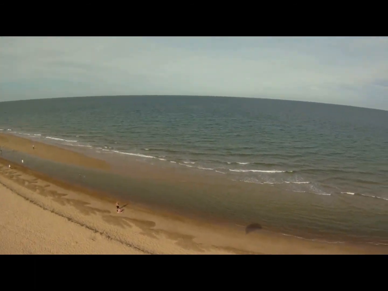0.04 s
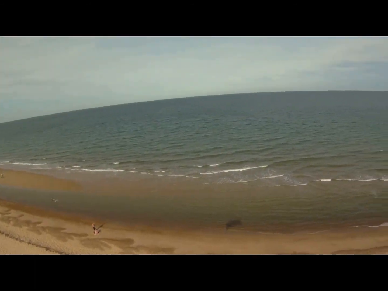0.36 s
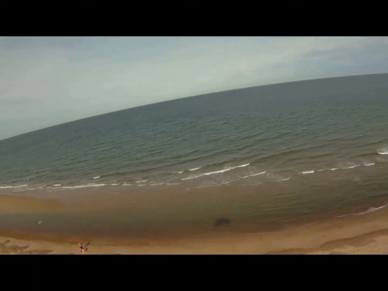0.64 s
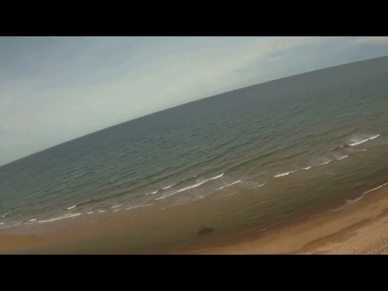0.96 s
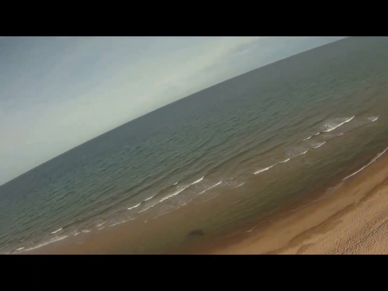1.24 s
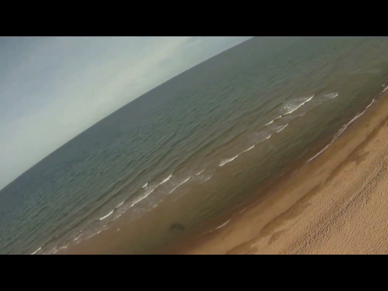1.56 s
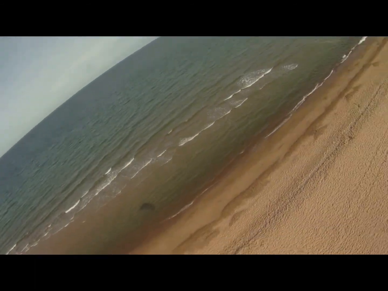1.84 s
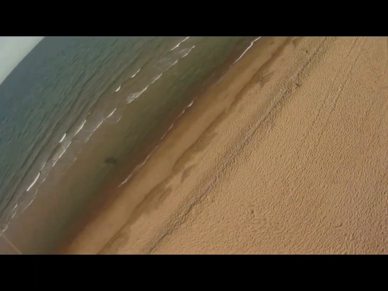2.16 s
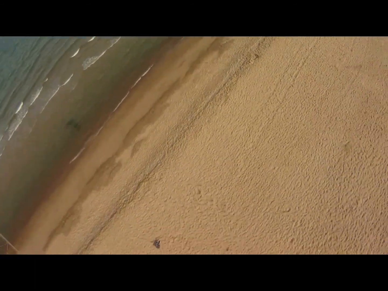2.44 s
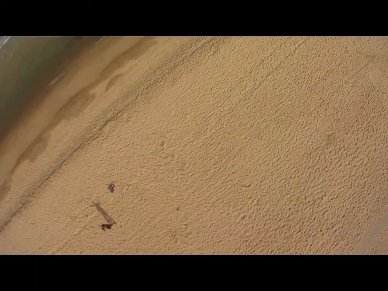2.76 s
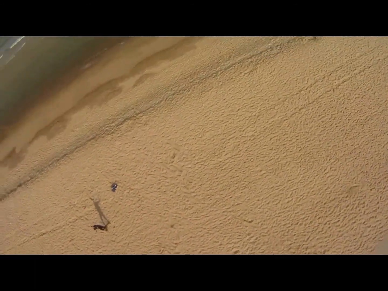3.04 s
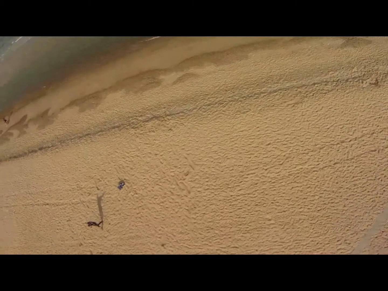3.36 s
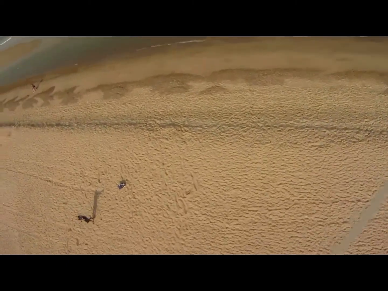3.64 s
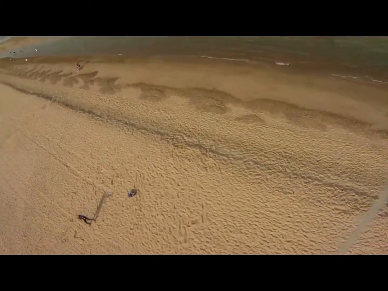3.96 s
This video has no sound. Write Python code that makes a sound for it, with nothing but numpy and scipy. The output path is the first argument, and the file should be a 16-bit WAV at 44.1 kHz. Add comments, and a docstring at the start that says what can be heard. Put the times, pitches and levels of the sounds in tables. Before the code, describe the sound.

Kite lines sing in the wind, several breathy whistles sliding slowly downward over a soft rush. Halfway through, a gust roars and thumps against the airborne microphone, and the whine grows louder and higher.

```python
"""Kite lines singing in the wind

Wind around a small camera hanging from a kite over a beach. The taut lines shed vortices and whistle,
sinking in pitch as the air slackens; then the rig swings into a gust, eddies buffet the housing and
the whine climbs. The recorder samples coarsely, so every whistle has a thin mirror image in the treble."""
import sys
import numpy as np
from scipy.fft import rfft, irfft
from scipy.io import wavfile
from scipy.ndimage import uniform_filter1d, map_coordinates

SR = 44100
rng = np.random.default_rng(int(sys.argv[2]) if len(sys.argv) > 2 else 0)


def file_out(sig):
    """Save sig as 16-bit WAV at sys.argv[1]."""
    # one column per channel
    cols = np.atleast_2d(sig).T
    # limit, then scale
    lim = np.clip(cols, -1, 1)
    pcm = np.round(lim * 32767).astype(np.int16)
    wavfile.write(sys.argv[1], SR, pcm)


N = 176400
T = np.arange(N) / SR
HZ = np.fft.rfftfreq(N, 1 / SR)

# Singing lines, and the housing's deep throb: (time [s], pitch [Hz], relative level [dB], waver rate [Hz])
KITE_LINE = [(0, 1370, -54, 121.7), (.25, 1314, -35, 55), (.45, 1270, -33, 30), (.8, 1199, -31, 24),
             (.95, 1150, -30, 22), (1.1, 1073, -29.5, 22), (1.35, 1027, -31, 19.84), (1.48, 1029, -30, 19),
             (1.56, 1022, -37, 18), (1.64, 1018, -40, 28), (1.8, 1006, -49.5, 40)]
STRING_PAIR = [(.82, 2350, -54, 60), (.95, 2207, -45, 39), (1.035, 2152, -32, 21), (1.09, 2130, -39, 21.7),
               (1.17, 2112, -35, 21.7), (1.24, 2100, -38.5, 24), (1.32, 2010, -43, 26),
               (1.48, 2006, -43, 34), (1.65, 1964, -51, 37)]
SLACKING_LINE = [(0, 2262, -28, 117.8), (.1, 2230, -32.5, 131.6), (.17, 2200, -26, 122.4),
                 (.26, 2177, -28.5, 117.1), (.3, 2133, -33.5, 162.1), (.5, 2041, -35.5, 129.7),
                 (.64, 1816, -42, 169.1), (.82, 1734, -37.5, 120), (1.1, 1623, -44.5, 133),
                 (1.5, 1580, -52, 149.4)]
THIN_LINE = [(1.72, 4140, -77, 201), (1.78, 4180, -47, 189.3), (1.93, 4250, -40, 192),
             (2.0, 4220, -56, 199)]
GUST_LINE = [(1.62, 2207, -47, 170.6), (1.66, 2203, -37, 171.2), (1.88, 2197, -36, 197.7),
             (1.98, 2148, -28, 52.96), (2.1, 2213, -26, 110), (2.22, 2213, -23, 143.6),
             (2.42, 2241, -22.5, 148.3), (2.47, 2220, -30, 182.3), (2.58, 2214, -21.5, 122.9),
             (2.72, 2232, -22.5, 132.5), (2.89, 2230, -19.5, 137.6), (3.0, 2304, -25, 170),
             (3.07, 2390, -19, 105.9), (3.13, 2520, -27, 130.2), (3.2, 2750, -26, 109),
             (3.27, 2824, -31, 126.5), (3.4, 2884, -29, 84.2), (3.5, 3062, -31, 180.5),
             (3.58, 2874, -34, 166.4), (3.7, 2910, -39, 209), (3.8, 3096, -30, 196), (4, 3150, -31, 165.8)]
LATE_GUST_LINE = [(3.05, 2257, -35, 161.1), (3.2, 2407, -25.5, 146.9), (3.27, 2380, -33.5, 121.8),
                  (3.4, 2400, -28, 76.2), (3.52, 2343, -33, 129.3), (3.58, 2297, -21, 169.8),
                  (3.73, 2330, -34, 189), (4, 2436, -32.5, 174.8)]
THROB = [(2.66, 64, -36.5, 18), (2.78, 72.2, -21, 18), (2.86, 73.9, -34, 16), (2.98, 82.5, -16, 8),
         (3.1, 76, -30.5, 18)]
# Brief louder, purer swells of the low whistle: (centre time [s], length [s], lift [dB])
SWELLS = [(0.436, 0.023, 7), (0.533, .018, 7), (0.846, 0.023, 5), (1.217, 0.033, 4.5), (1.351, 0.026, 6),
          (1.492, 0.032, 6), (1.632, 0.031, 9.5)]
# Fader moves for the wind layers, lowest to highest: (time [s], relative level [dB])
SWAY = [(0.0, -45), (0.08, -29), (0.25, -36), (1.57, -47.5), (2.42, -34), (2.52, -19.5), (2.87, -37),
        (2.95, -27), (3.5, -34.5), (3.57, -19), (3.69, -32), (3.85, -24.5), (4.0, -37)]
BUFFET = [(0.0, -33.5), (1.43, -46), (1.84, -44), (2.23, -21.5), (2.45, -21.5), (2.49, -28), (2.72, -17.5),
          (2.97, -18.5), (3.21, -37.5), (3.39, -25), (3.48, -35), (3.6, -18), (3.69, -13.5), (3.74, -28),
          (3.92, -32.5), (4.0, -24)]
ROAR = [(0.0, -48), (1.54, -62.5), (1.86, -40.5), (2.24, -28.5), (2.44, -30.5), (2.49, -40), (2.54, -30.5),
        (2.74, -19), (2.97, -18.5), (3.07, -28.5), (3.09, -39), (3.52, -34.5), (3.59, -19), (3.68, -17),
        (3.74, -35), (4.0, -30)]
RUSH = [(0.0, -34.5), (0.38, -37), (0.89, -42), (1.49, -46.5), (1.9, -38), (2.5, -34.5), (2.93, -32),
        (3.13, -37.5), (3.66, -32.5), (3.71, -36), (4.0, -33)]
HISS = [(0.0, -60.5), (0.25, -47.5), (0.32, -70), (1.57, -64), (1.72, -48.5), (1.9, -38.5), (2.04, -42),
        (2.92, -37.5), (3.15, -47.5), (3.48, -48), (3.6, -34), (3.85, -50), (4.0, -48.5)]
# Tone colour of each wind layer: (frequency [Hz], relative gain [dB])
SWAY_EQ = [(10, -28), (22, -3.5), (34, 2.5), (50, 11), (75, -14.5), (200, -46.5), (1000, -85)]
BUFFET_EQ = [(25, -20.5), (50, -20), (75, 5), (110, -1), (165, -1.5), (230, -14.5), (400, -31), (2000, -80)]
ROAR_EQ = [(100, -2.5), (210, -1), (280, 3.5), (450, -3), (730, -9.5), (1100, -6), (1500, -20.5),
           (3000, -18), (5500, -35)]
RUSH_EQ = [(300, -15), (700, -5.5), (1000, 1), (1450, 1.5), (1900, -0.5), (2400, -15), (3000, -16),
           (3600, -19.5), (5500, -40.5)]
HISS_EQ = [(800, -47), (2000, -8), (2800, 6), (3350, 0.5), (3900, 1), (4500, 2), (5100, -10), (5700, -16.5)]
# Hollow resonances of the housing: (frequency [Hz], width [Hz], lift [dB])
HOUSING = [(135.7, 20.7, 8.5), (195, 18.5, 3.5), (334, 51, 3.5), (575, 69, 10.5), (863, 70, 5.5),
           (1115, 68, 4.5), (1287, 76, 9), (1655, 62, 8.5), (2176, 150, 11.5), (2460, 241, 12),
           (3690, 76, 5.5), (5400, 177, 7)]
# Rasps of air, eddies thumping the housing, a tick of the rig: (time [s], relative level [dB])
RASPS = [(.079, -48), (.154, -44), (.198, -52), (.256, -48), (1.66, -48.5), (3.209, -39), (3.88, -47)]
THUMPS = [(2.236, -8.5), (2.437, -18.5), (2.463, -15), (2.527, -9), (2.983, -4)]
TICKS = [(1.277, -47)]
# Stereo width: (frequency [Hz], side gain [dB])
SIDE_EQ = [(30, -32), (120, -44.5), (500, -26.5), (2200, -29), (4000, -14.5), (5700, -12)]
# Leak of the mirror image into the treble: (frequency [Hz], gain [dB])
MIRROR_EQ = [(6200, 5), (7200, -4.5), (8000, -6), (9200, -13), (9900, -16.5), (10500, -20.5), (10850, -66),
             (12000, -81.5), (13600, -61.5), (14200, -44.5), (15300, -36)]

SKIRT_WIDTH = 2.6  # width of a whistle's breathy fringe, relative to its core
SWING_LIMIT = 6  # a line cannot swing beyond this many times its usual strength
CLEAN_SHARE, SWELL_HUSH_DB = .62, 13  # kite line: steady share between swells, fringe drop in a swell
RASP_WIDTH_S, THUMP_DECAY_S = 0.0055, 0.0004
TICK_HZ, TICK_DECAY_S = 4200, 0.0018
SAMPLING_HZ, PASS_HZ, EDGE_HZ = 12000, 5700, 15800
CEILING_DB, THIRD_MIRROR_DB = -2.5, -35.5


def whistle(rows, gain_db, skirt_db, clean=0, shift_hz=0):
    """Shed vortices sing: a wavering tone in a breathy skirt; clean is the steady share of its core."""
    clock = np.cumsum(curve(rows, axis=3)) / SR
    core = waver(clock)
    core = unit(core / np.sqrt(uniform_filter1d(abs(core) ** 2, size=4000)))  # even out slow swells
    share = np.clip(clean, 0, 1)
    core = np.sqrt(share) + np.sqrt(1 - share) * core
    core = unit(core / np.sqrt(1 + (abs(core) / SWING_LIMIT) ** 2))
    skirt = amp(skirt_db) * waver(clock * SKIRT_WIDTH)
    phase = 2 * np.pi * np.cumsum(curve(rows) + shift_hz) / SR
    tone = ((core + skirt) * np.exp(1j * phase)).real
    outside_s = np.maximum(np.maximum(rows[0][0] - T, T - rows[-1][0]), 0)
    fade = np.exp(-outside_s / 0.052)  # in before the first row, out after the last
    return np.sqrt(2) * tone * amp(curve(rows, axis=2) + gain_db) * fade


def kite_line():
    """The low whistle sinks, with brief louder, purer swells: early flutter peaks, then steady pulses."""
    swells = np.array([1 / (1 + ((T - s) / (length / 2)) ** 8) for s, length, _ in SWELLS])
    swelling = swells.sum(0)
    steady = CLEAN_SHARE + (1 - CLEAN_SHARE) * swelling
    skirt_db = -4.5 - SWELL_HUSH_DB * swelling
    lift_db = np.array(SWELLS)[:, 2] @ swells
    return whistle(KITE_LINE, -0.76, skirt_db, clean=steady) * amp(lift_db)


def string_pair():
    """Two like strings whistle at close pitches and beat against each other."""
    return (whistle(STRING_PAIR, -1.2, skirt_db=-21, clean=0.43)
            + whistle(STRING_PAIR, -2.5, skirt_db=-9, clean=0.67, shift_hz=58))


def rig_lines():
    """The rougher lines of the rig: one sinks in the lull, the others whine in the gust."""
    return (whistle(SLACKING_LINE, -0.36, skirt_db=-5.5)
            + whistle(THIN_LINE, -1, skirt_db=-10)
            + whistle(GUST_LINE, -0.89, skirt_db=-5)
            + whistle(LATE_GUST_LINE, -0.93, skirt_db=-1.5))


def wind():
    """Pressure sway and buffeting ride on slower puffs; roar, rush and hiss flutter with quick eddies."""
    eddies, puffs = wander(rate_hz=160), wander(rate_hz=45)
    return (air(SWAY, SWAY_EQ, -0.85, puffs, flutter_db=.5, calm=0.77)
            + air(BUFFET, BUFFET_EQ, 0, puffs, flutter_db=0.96, calm=.5)
            + air(ROAR, ROAR_EQ, 0.23, eddies, flutter_db=1.5, calm=0.32)
            + air(RUSH, RUSH_EQ, 2.37, eddies, flutter_db=2.05, calm=0.2)
            + air(HISS, HISS_EQ, 9.1, unit(eddies + 0.24 * puffs), flutter_db=1.8, calm=0.07))


def air(levels, eq, gain_db, eddies, flutter_db, calm):
    """Turbulence coloured by the housing and shaken by eddies; calm (0 to 1) evens out its slow swells."""
    housing_db = sum(db * np.exp(-.5 * ((HZ - hz) / width) ** 2) for hz, width, db in HOUSING)
    flow = noise(colour(eq) * amp(housing_db))
    flow *= amp(flutter_db * 2 * np.tanh(eddies / 2))
    power = uniform_filter1d(uniform_filter1d(flow ** 2, size=3000), size=3000)
    evened = unit(flow / (abs(power) + 1e-20) ** (calm / 2))
    return evened * amp(curve(levels) + gain_db)


def housing_throb():
    """The housing sheds its own vortices at the top of the gust: a deep throb."""
    return whistle(THROB, 0, skirt_db=-15, clean=0.6)


def thumps():
    """Single eddies hit the housing as brief suction pulses."""
    return sum(-amp(db) * np.exp(-abs(T - s) / THUMP_DECAY_S) for s, db in THUMPS)


def rasps():
    """Brief bursts of hiss as the flow catches and lets go."""
    bursts = sum(amp(db) * np.exp(-.5 * ((T - s) / RASP_WIDTH_S) ** 2) for s, db in RASPS)
    return amp(4.5) * bursts * noise(colour(HISS_EQ))


def rig_tick():
    """The rig gives one small, bright tick that dies at once."""
    envelope = sum(amp(db) * (T >= s) * np.exp(-abs(T - s) / TICK_DECAY_S) for s, db in TICKS)
    return envelope * noise(1 / (1 + ((HZ - TICK_HZ) / 900) ** 2))


def waver(clock):
    """Smooth random drift of strength and phase, two new values per turn of the clock."""
    knots = rng.standard_normal((2, 30000))
    real, imag = (map_coordinates(k, [2 * clock], order=3, mode="wrap") for k in knots)
    return unit(real + 1j * imag)


def wander(rate_hz):
    """Random motion of rms 1, up to about the given rate."""
    return noise(1 / (1 + (HZ / rate_hz) ** 2) ** 2)


def noise(gain):
    """Filtered noise of rms 1."""
    return unit(shaped(rng.standard_normal(N), gain))


def shaped(x, gain):
    """Filters by a gain for every frequency."""
    return irfft(rfft(x) * gain, N)


def colour(eq):
    """Gain at every frequency from a few EQ points."""
    hz, db = np.transpose(eq)
    return amp(np.interp(np.log(HZ + 1), np.log(hz), db))


def curve(rows, axis=1):
    """One column of a table, joined by straight lines in time."""
    rows = np.array(rows)
    return np.interp(T, rows[:, 0], rows[:, axis])


def amp(db):
    """Decibels to gain."""
    return 10 ** (np.asarray(db) / 20)


def unit(x):
    """Scales to rms 1."""
    return x / np.sqrt(np.mean(abs(x) ** 2) + 1e-20)


def scene():
    """Everything reaches one small microphone; the stereo image is narrow."""
    mid = wind() + housing_throb() + kite_line() + string_pair() + rig_lines()
    mid += rasps() + thumps() + rig_tick()
    side = shaped(mid * wander(rate_hz=250), colour(SIDE_EQ))
    return np.array([mid + side, mid - side])


def record(dry):
    """The microphone overloads softly; coarse sampling keeps the lower band and mirrors it upward."""
    rounded = dry / (1 + (dry / amp(CEILING_DB)) ** 4) ** (1 / 4)
    low = shaped(rounded, 1 / np.sqrt(1 + (HZ / PASS_HZ) ** 200))
    sampling_phase = 2 * np.pi * SAMPLING_HZ * T
    mirror = shaped(low * 2 * np.cos(sampling_phase), colour(MIRROR_EQ))
    # faint images either side of a third of the sampling rate
    ghost = amp(THIRD_MIRROR_DB) * low * 2 * np.cos(sampling_phase / 3)
    return shaped(low + mirror + ghost, 1 / np.sqrt(1 + (HZ / EDGE_HZ) ** 200))


dry = scene()
out = record(dry)
file_out(out)
```